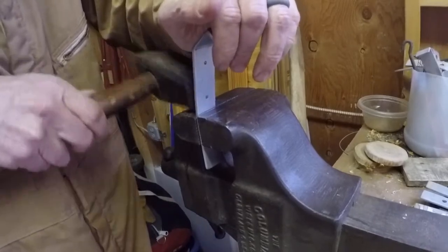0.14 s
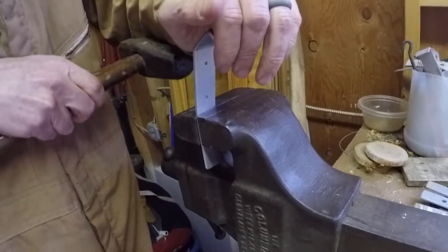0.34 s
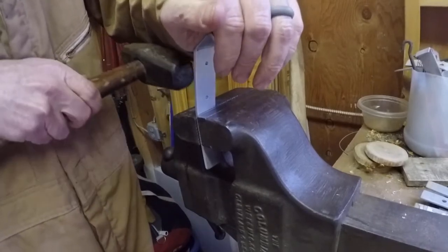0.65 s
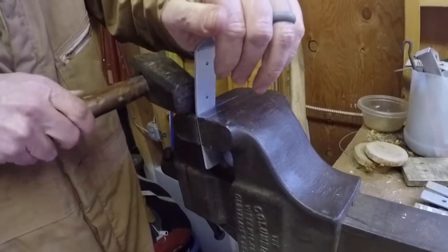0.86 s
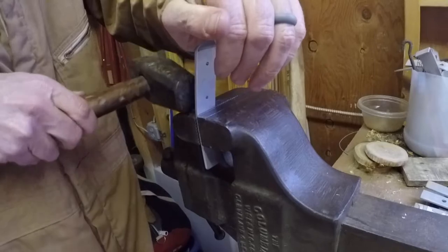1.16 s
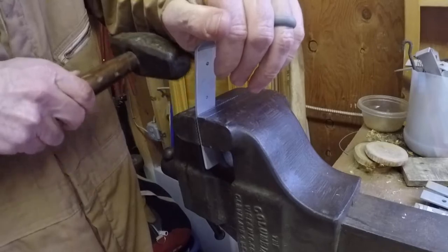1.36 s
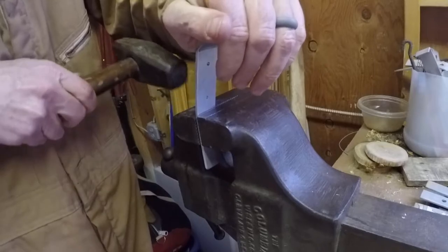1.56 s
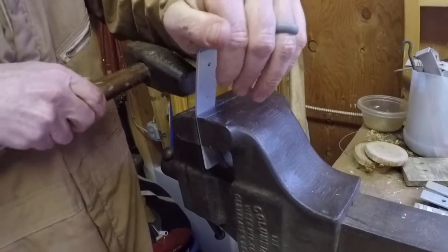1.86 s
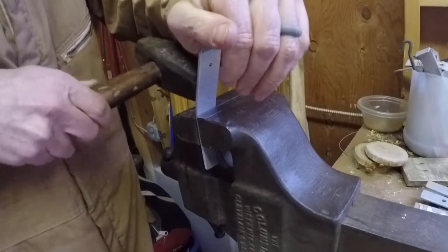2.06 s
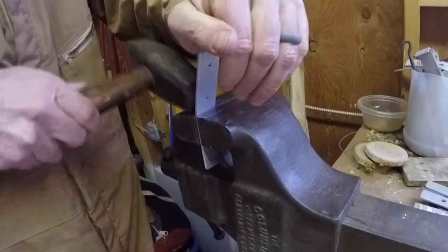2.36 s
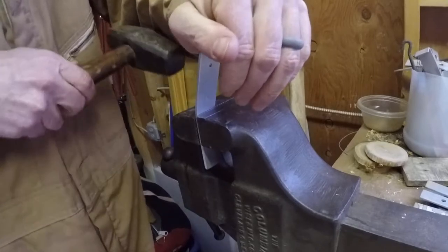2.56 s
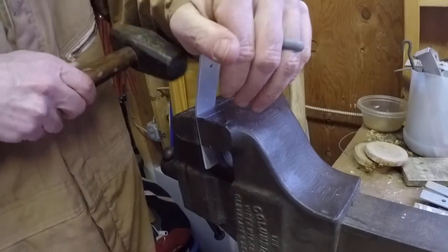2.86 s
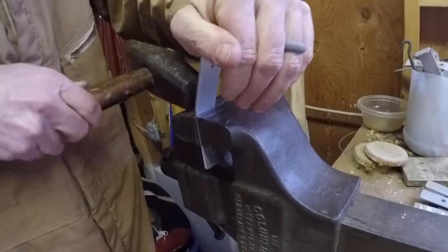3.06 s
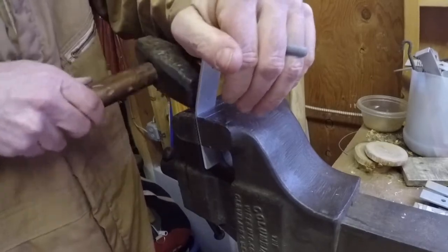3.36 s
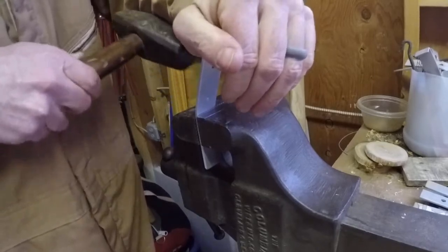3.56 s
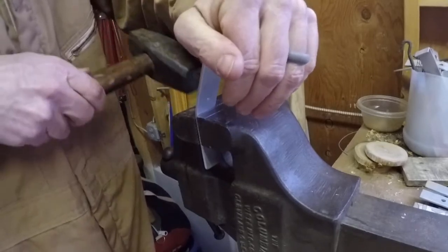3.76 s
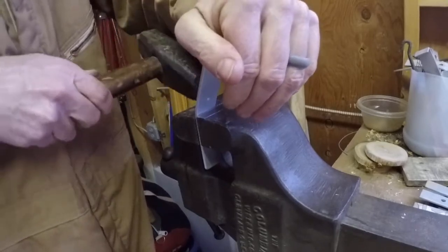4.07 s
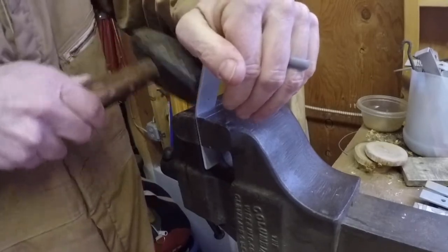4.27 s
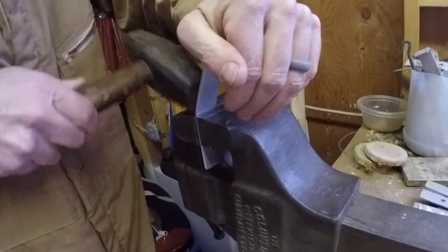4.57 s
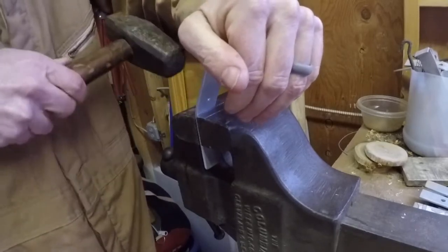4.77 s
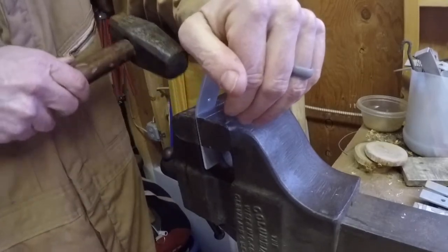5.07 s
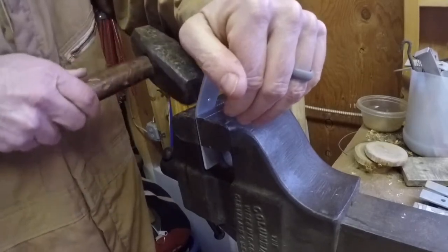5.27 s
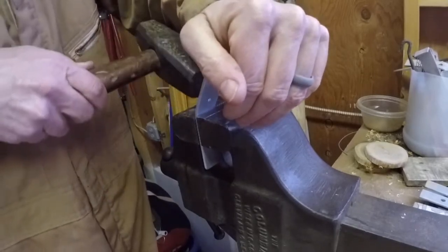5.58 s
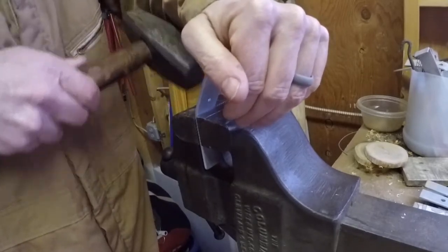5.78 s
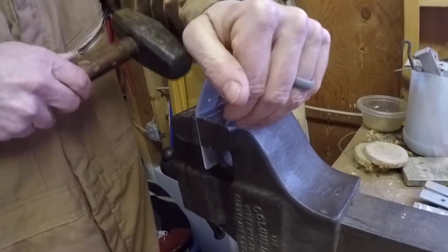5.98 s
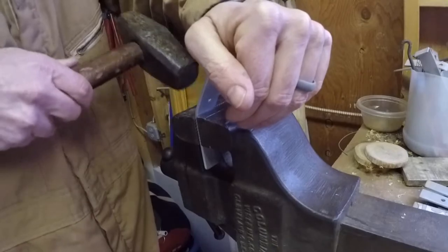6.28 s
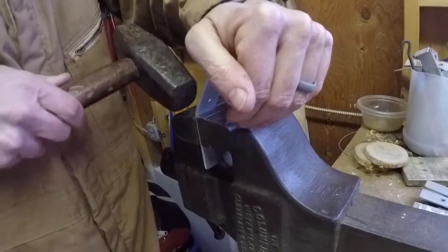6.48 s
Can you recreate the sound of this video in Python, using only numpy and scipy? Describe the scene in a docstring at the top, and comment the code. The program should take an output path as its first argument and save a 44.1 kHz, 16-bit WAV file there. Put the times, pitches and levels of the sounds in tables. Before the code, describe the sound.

Over quiet low rumble, faint hiss and a barely audible thin ring, an even run of twenty-one hammer taps on clamped soft metal begins almost at once. The clacks vary in force and brightness, each with a thump through vise and bench and a tiny clatter. Glancing double touches occur mostly early on; later taps sound fuller and less ringing. Close microphone, dry small room, peaks a little crushed.

```python
"""First come a low rumble with faint hiss, a thin ring, and the fading swing of a workbench.
Then a hammer taps an aluminium strip in a bench vise, three times a second, slowly bending it over.
Each tap is filtered noise for the clack, fading sines for metal and bench, and a rattle of loose things.
A faint, bright wash of noise follows the first tap; some taps are followed by glancing bounces.
Decaying noise gives the small workshop's brief answer, and the close microphone overloads on the attacks."""
import sys
import numpy as np
from scipy import signal
from scipy.fft import rfft, irfft
from scipy.io import wavfile
from scipy.ndimage import uniform_filter1d

SR = 44100
rng = np.random.default_rng(int(sys.argv[2]) if len(sys.argv) > 2 else 0)


def file_out(sig):
    """Save sig as 16-bit WAV at sys.argv[1]."""
    # one column per channel
    cols = np.atleast_2d(sig).T
    # limit, then scale
    lim = np.clip(cols, -1, 1)
    pcm = np.round(lim * 32767).astype(np.int16)
    wavfile.write(sys.argv[1], SR, pcm)


N = 292383
T = np.arange(int(.7 * SR)) / SR  # time within one sound, s


def amp(db):
    """Turns decibels into an amplitude factor."""
    return 10 ** (np.asarray(db) / 20)


def read(points, hz):
    """Reads a curve joined by straight lines over log frequency."""
    f, value = np.transpose(points)
    return np.interp(np.log(hz + 1), np.log(f + 1), value)


def add(mix, s, sound):
    """Lays a sound into the mix at time s; what falls outside is dropped."""
    start = round(s * SR)
    sound = sound[max(-start, 0):]
    part = mix[max(start, 0):][:len(sound)]
    part += sound[:len(part)]


def unit(x):
    """Scales to an energy of one."""
    return x / np.sqrt(np.sum(x ** 2) + 1e-20)


def colour(x, gain_db):
    """Filters without sounding early (minimum phase); gain_db gives the gain at each frequency."""
    hz = abs(np.fft.fftfreq(2048, 1 / SR))
    log_gain = np.log(amp(gain_db(hz)))
    response = np.exp(np.conj(signal.hilbert(log_gain)))
    impulse = np.fft.ifft(response).real
    return signal.fftconvolve(x, impulse)[:len(x)]


# Colour of the steady rumble and hiss: (f/Hz, relative level per Hz/dB)
FLOOR_SPECTRUM = [(15, -25), (25, -7), (66, 1), (237, -17.5), (309, -22), (790, -32), (1030, -33),
                  (1120, -32), (1960, -40), (3010, -38), (9270, -54.5), (11200, -56.5), (15000, -62)]


def room_tone(level_db=-41):
    """Steady low rumble and faint hiss: random noise given a fixed spectrum."""
    gain = amp(read(FLOOR_SPECTRUM, np.fft.rfftfreq(N, 1 / SR)))
    shaped = irfft(rfft(rng.standard_normal(N)) * gain, N)
    return amp(level_db) * shaped / shaped.std()


# Pitch of the thin ring, read at each tap and held until the next: (t/s, f/Hz)
THIN_RING_PITCH = [(.48, 1026), (1.1, 1015), (2.39, 1026), (3.02, 1020), (3.97, 1042), (4.29, 1039),
                   (4.89, 988), (5.52, 1040), (5.83, 1040), (6.44, 976)]


def singing(fade_db_per_s=6, level_db=1, before_db=-53):
    """One faint, slowly fading ring; every tap sets its pitch and strength anew."""
    changes = [(0.0072, before_db)] + [(row[0], row[-1]) for row in TAP_LIST]
    s, db = np.transpose(changes)
    hz = np.interp(s, *np.transpose(THIN_RING_PITCH))
    t = np.arange(N) / SR
    last = np.maximum(np.searchsorted(s, t, "right") - 1, 0)
    fading_db = level_db + db[last] - fade_db_per_s * (t - s[last])
    level = uniform_filter1d(amp(fading_db), size=400)  # smooths the steps
    phase = 2 * np.pi * np.cumsum(hz[last]) / SR
    return level * np.sin(phase)


# Ways the bench and vise swing: (f/Hz, relative level/dB, time to fade by 60 dB/s)
BENCH_MODES = [(42.4, -11, 0.26), (47.74, -7, 0.3), (53.6, -19.5, 0.92), (73.42, -17, .5),
               (84.04, -15, 0.4), (121.3, -15, 0.39), (138.7, -2, .116), (157, -12, 0.3), (181.8, -1, 0.12),
               (198.25, -12.5, 0.28), (218.65, -9, 0.25), (248.4, -20.5, 0.33), (272.2, -21.5, .28),
               (315, -26, 0.31), (348.9, -10.5, 0.1), (369.8, -22, 0.22), (422, -29.5, 0.36),
               (461.3, -21, 0.19), (488.7, -21, .17), (538.6, -18.5, 0.21), (568, -7, 0.064),
               (610.3, -14, 0.07), (663, -25, .15), (756, -23, 0.19), (865, -27, 0.12), (920, -22.5, .22)]


def bench(knock_db, delay_s=0.0008, rise_s=0.0072, spread_db=2.0, cutoff_hz=32):
    """The blow passes through the vise and sets the bench swinging; the slowest motion radiates little."""
    hz, db, t60 = np.transpose(BENCH_MODES)[:, :, None]
    t = np.maximum(T - delay_s, 0)
    knock_share = read([(100, 0), (200, 0.33), (330, 0.81), (700, 0.24), (1000, 0.31)], hz)
    level_db = db + knock_db * knock_share
    level_db = level_db + spread_db * rng.standard_normal(hz.shape)
    modes = amp(level_db - 60 * t / t60) * np.sin(2 * np.pi * hz * t)
    swing = modes.sum(0) * (1 - np.exp(-t / rise_s))
    highpass = signal.butter(2, cutoff_hz, "high", fs=SR, output="sos")
    return signal.sosfilt(highpass, -swing)


# The strip folds over, and the blows go more squarely into the vise: (t/s, bend from 0 to 1)
STRIP_BEND = [(2.8, 0.01), (4.1, 0.94)]


def bend_at(s):
    """How far the strip has folded at time s, 0-1."""
    return np.interp(s, *np.transpose(STRIP_BEND))


# Colour of the contact: (f/Hz, level upright/dB, level bent/dB, change per dB of force/dB,
# change per octave of strip resonance/dB, share of the sharpness)
CONTACT_COLOUR = [(1205, -0.3, 2, -0.4, -0.5, 0), (2370, 2, 1, 0, -1, 0), (3670, 0, -2.5, 0, -1, 0),
                  (4460, -5, -3, 0.36, -11, 0), (7560, 3, 3.5, 0.1, 12, 0), (11800, 0, -0.2, -.8, 15.5, 1)]


def contact_colour(bend, force_db, octaves, sharp_db):
    """Hard blows dent the soft metal and sound duller; stiff spots and sharp contacts sound brighter."""
    hz, upright_db, bent_db, per_force, per_octave, share = np.transpose(CONTACT_COLOUR)
    gain_db = upright_db + bend * (bent_db - upright_db)
    gain_db = gain_db + per_force * force_db + per_octave * octaves + share * sharp_db
    return np.column_stack([hz, gain_db])


# Basic colour of the clack: (f/Hz, relative level per Hz/dB)
CLACK_SPECTRUM = [(200, -25.5), (600, -1), (1100, -0.5), (1900, -8), (2600, -3.5), (4200, 0.5), (6500, -6),
                  (9500, -12), (11300, -3), (14500, -14), (16000, -5)]


def clack(strip_hz, contact, contact_s=0.0021, shudder_s=0.0086, shudder_db=-16, strip_db=4, width_hz=320,
          flex_db=-7.0, flex_s=0.0021, soften_s=0.0049):
    """Steel chatters on aluminium for a few ms, dulling at once; the hand-damped strip flexes briefly."""
    t = T[:3000]
    fade = np.exp(-t / contact_s) + amp(shudder_db) * np.exp(-t / shudder_s)
    chatter = rng.standard_normal(len(t)) * fade

    def strike_gain(hz):
        """The clack's colour with a peak where the strip resonates."""
        strip_peak = strip_db / (1 + ((hz - strip_hz) / width_hz) ** 2)
        return read(CLACK_SPECTRUM, hz) + read(contact, hz) + strip_peak

    bright = colour(unit(chatter), strike_gain)
    dull = colour(bright, lambda hz: read([(5000, 6.5), (12000, -3.0)], hz))
    flex = np.sin(2 * np.pi * strip_hz * t) * t * np.exp(-2 * t / flex_s)
    softening = dull + (bright - dull) * np.exp(-(t / soften_s) ** 2)
    return softening + amp(flex_db) * unit(flex)


# Ringing of strip, vise and hammer head:
# (f/Hz, relative level upright/dB, relative level bent/dB, time to fade by 60 dB/s)
METAL_MODES = [(1480, -32, -34, .18), (1812, -30, -31, .18), (2428, -27, -35, .13), (2622, -25, -28, .12),
               (3300, -24, -28, .13), (4254, -23, -37, .15), (4605, -24, -40, .19), (5120, -32, -42, .18),
               (5660, -31, -35, .12), (6584, -55, -45, .28), (7570, -35, -55, .18), (8590, -42, -51, .15),
               (9528, -47, -42, .13), (10990, -43, -48, .2), (13310, -45, -41, .12)]


def metal(s, spread_db=0.0, split=.0055, count=3):
    """Thin metal modes in close, beating groups; their balance shifts as the strip folds over."""
    hz, upright_db, bent_db, t60 = np.repeat(METAL_MODES, count, axis=0).T[:, :, None]
    level_db = upright_db + bend_at(s) * (bent_db - upright_db)
    level_db = level_db + spread_db * rng.standard_normal(hz.shape)
    detune = 1 + split * rng.standard_normal(hz.shape)
    t = T[:12000]
    cycles = hz * detune * t + rng.random(hz.shape)
    ring = amp(level_db - 60 * t / t60) * np.sin(2 * np.pi * cycles)
    return ring.sum(0) / np.sqrt(count)


# Colour of the loose things: (f/Hz, relative level per Hz/dB)
RATTLE_SPECTRUM = [(250, 4), (600, 0.5), (1400, 3), (1750, 4), (2050, -3), (2600, -0.5), (3300, -1.5),
                   (4800, -11.5), (7000, -17), (10000, -26), (15000, -35.5)]


def rattle(s, scatter_s=.013, ring_s=0.0033, hop=.65, hop_db=-11, clink_db=-10, clink_s=.008, count=9):
    """Loose things jump, land some 30 to 50 ms later, each with its own brief clink, and hop once more."""
    t = T[:8000]
    earliest_s = np.interp(s, [0, 2.5, 6.6], [.038, .036, .028])
    first = earliest_s + scatter_s * rng.random((count, 1))
    strength = rng.uniform(0.82, 1, (count, 1))
    second = first * (1 + hop * rng.uniform(0.91, 1.0, (count, 1)))
    lands = np.vstack([first, second])
    size = np.vstack([strength, strength * amp(hop_db)]) * (t > lands)  # silent before landing
    age = np.maximum(t - lands, 0)
    energy = (size ** 2 * np.exp(-2 * age / ring_s)).sum(0)
    clatter = np.sqrt(energy) * rng.standard_normal(len(t))
    pitch_hz = np.tile(rng.uniform(1200, 3500, (count, 1)), (2, 1))  # same pitch for both landings
    clinks = (size * np.exp(-age / clink_s) * np.sin(2 * np.pi * pitch_hz * age)).sum(0)
    return colour(unit(clatter) + amp(clink_db) * unit(clinks), lambda hz: read(RATTLE_SPECTRUM, hz))


# How long the workshop answers: (f/Hz, time to fade by 60 dB/s)
WORKSHOP_FADE = [(200, 0.3), (1200, 0.2355), (3000, 0.2043), (6000, 0.2127), (10000, 0.14), (15000, 0.21)]
# Colour of that answer at its start: (f/Hz, relative level/dB)
WORKSHOP_COLOUR = [(200, 10), (1200, 2), (3000, -2.5), (6000, -4), (10000, -3), (15000, -6)]


def workshop(x, first_s=0.005):
    """Many blurred reflections, made of noise that fades fast; the low end lasts longest."""
    hz, t, z = signal.stft(rng.standard_normal(len(T)), SR, nperseg=256)
    level_db = read(WORKSHOP_COLOUR, hz)[:, None] - 60 * t / read(WORKSHOP_FADE, hz)[:, None]
    tail = signal.istft(z * amp(level_db), SR, nperseg=256)[1][:len(T)]
    tail = tail * np.clip(T / first_s - 1, 0, 1)  # silent until first_s, full at twice that
    return signal.fftconvolve(x, unit(tail))[:len(x)]


def in_room(x, room_db=-9):
    """A near sound together with the room's answer."""
    x = np.pad(x, (0, len(T) - len(x)))
    return x + amp(room_db) * workshop(x)


# The bench's answer: relative level upright/dB, bent/dB, and change per dB of force/dB
THUMP_DB, THUMP_BENT_DB, THUMP_PER_FORCE = -2, 1, 0.47
KNOCK_DB, KNOCK_BENT_DB, KNOCK_PER_FORCE = -4.5, 3.5, .25
# A stiffer spot on the strip rings higher, clacks brighter and passes less knock to the bench
USUAL_STRIP_HZ, KNOCK_DB_PER_OCTAVE = 3230, -6.5


def tap(s, force_db, strip_hz, sharp_db, loose_db, clack_db=20, rattle_db=12.5, metal_db=-3,
        shaken_db=-9, shaken_s=.042, bench_db=-0.45):
    """One blow: clack and ringing metal, the bench's thump, then the rattle."""
    bend, octaves = bend_at(s), np.log2(strip_hz / USUAL_STRIP_HZ)
    contact = contact_colour(bend, force_db, octaves, sharp_db)
    thump_db = THUMP_DB + bend * (THUMP_BENT_DB - THUMP_DB) + THUMP_PER_FORCE * force_db
    knock_db = KNOCK_DB + bend * (KNOCK_BENT_DB - KNOCK_DB)
    knock_db = knock_db + KNOCK_PER_FORCE * force_db + KNOCK_DB_PER_OCTAVE * octaves
    ring = metal(s)
    strike = amp(metal_db) * colour(ring, lambda hz: read(contact, hz))
    add(strike, 0, amp(clack_db) * clack(strip_hz, contact))
    blow = amp(force_db) * strike
    add(blow, 0, amp(loose_db + rattle_db) * rattle(s))
    add(blow, shaken_s, amp(loose_db + shaken_db) * ring)  # the rattling shakes the metal again
    return in_room(blow) + amp(thump_db + bench_db) * bench(knock_db)


def wash(length_s, level_db):
    """A faint, broad, bright wash: filtered noise that swells and fades."""
    t = T[T < length_s]
    wash_spectrum = [(300, 4), (2000, 6), (5000, 0), (9000, -9), (15000, -21.5)]
    noise = colour(rng.standard_normal(len(t)), lambda hz: read(wash_spectrum, hz))
    return amp(level_db) * noise / noise.std() * np.sin(np.pi * t / length_s) ** 2


def bounce(s, ring_db=3, touch_db=18, buzz_db=13, buzz_hz=4400, buzz_width_hz=300, buzz_s=0.0062):
    """A glancing second touch: duller than the tap, and the strip buzzes against the hammer face."""
    t = T[:6000]
    buzz = colour(rng.standard_normal(len(t)) * np.exp(-t / buzz_s),
                  lambda hz: -20 * np.log10(1 + ((hz - buzz_hz) / buzz_width_hz) ** 2))
    soft_contact = [(4000, 1.5), (7000, 0.5), (12000, -20.0)]
    touch = amp(ring_db) * metal(s)
    soft_clack = clack(strip_hz=2422, contact=soft_contact, contact_s=0.0029, flex_db=-1.5, flex_s=.004)
    add(touch, 0, amp(touch_db) * soft_clack)
    add(touch, 0, amp(buzz_db) * unit(buzz))
    return in_room(touch)


# One row a tap: (t/s, force/dB, strip resonance under the hammer face f/Hz,
# sharpness of contact/dB, rattle level/dB, level of the thin ring left behind/dB)
TAP_LIST = [(0.168, -5, 2950, 1, -2, -47.5), (0.4797, 5, 2930, 0, 7, -51), (0.787, 4.5, 2590, 2, 2.5, -61),
            (1.101, -1, 3860, 1, 3.5, -51), (1.4286, 2, 3820, 4.5, 4.5, -55.5),
            (1.7477, -1.5, 3270, 1.5, 2.5, -53), (2.0633, -2.5, 3210, 2, 8.5, -51.5),
            (2.3859, 5, 2610, -1, -3, -49), (2.698, -1.5, 3470, 1.5, 0, -62), (3.021, 1, 3500, 5, 4, -59),
            (3.3272, 2, 3474, 2.5, -.5, -52.5), (3.638, 0.5, 3160, 4, 2, -46.5),
            (3.9697, 3, 3110, 6, 4, -61.5), (4.2888, 2, 3075, -8, 3, -49.5),
            (4.5891, 2.5, 3160, 2, 2.5, -55.5), (4.891, 0.5, 3250, -3.5, -1.5, -60),
            (5.2057, 1, 3340, 1.5, -4, -49.5), (5.518, -0.5, 3144, 4.5, -2, -48),
            (5.8272, 2.5, 3170, -0.5, -2, -47), (6.1379, 1, 3100, 2.5, -1.5, -70),
            (6.4402, 0.5, 2900, 0.5, -6, -58.5)]
# The hammer bounces back onto the strip: (t/s, level/dB)
BOUNCE_LIST = [(0.211, -26), (1.1553, -7.5), (1.4742, -12), (1.794, -23.5), (2.1073, -14), (2.248, -40),
               (2.76, -26), (4.6366, -21)]


def scene(earlier_db=-2):
    """All taps and bounces over the quiet of the workshop."""
    mix = room_tone() + singing()
    add(mix, -.145, amp(earlier_db) * bench(0))  # the bench still swings from an earlier tap
    add(mix, .2, in_room(wash(length_s=0.16, level_db=-43.5), room_db=-2))
    for s, force_db, strip_hz, sharp_db, loose_db, _ in TAP_LIST:
        add(mix, s, tap(s, force_db, strip_hz, sharp_db, loose_db))
    for s, db in BOUNCE_LIST:
        add(mix, s, amp(db) * bounce(s))
    return mix[None]


def record(dry, ceiling=0.95, knee=3.6, edge_hz=15350):
    """The microphone rounds off the loudest peaks; then a filter removes the highest treble."""
    overloaded = dry / (1 + abs(dry / ceiling) ** knee) ** (1 / knee)
    lowpass = signal.firwin(301, edge_hz, window=("kaiser", 8), fs=SR)
    return signal.oaconvolve(overloaded, lowpass[None], "same")


dry = scene()
out = record(dry)
file_out(out)
```